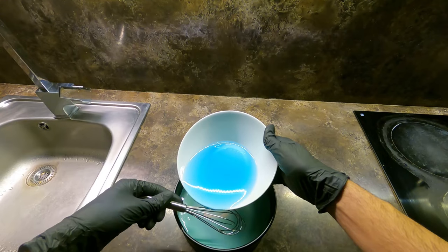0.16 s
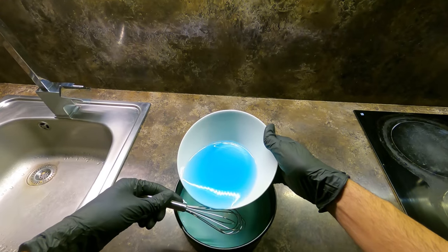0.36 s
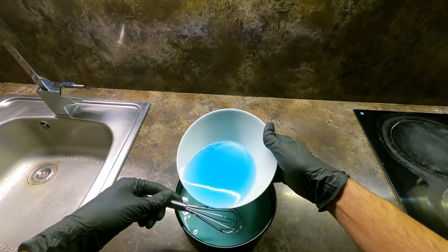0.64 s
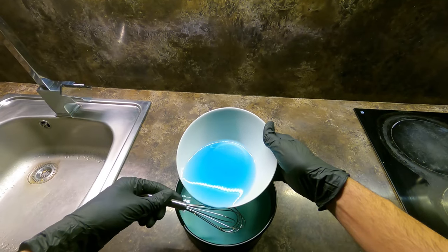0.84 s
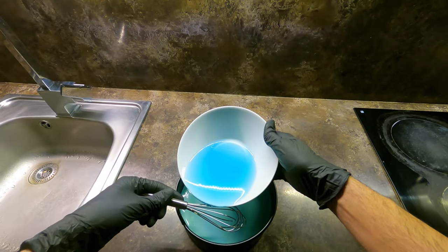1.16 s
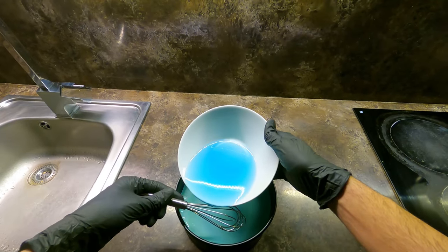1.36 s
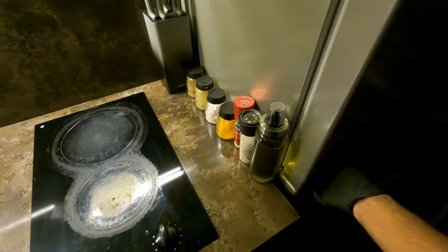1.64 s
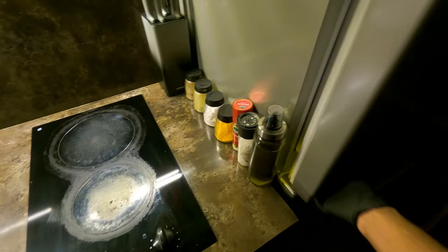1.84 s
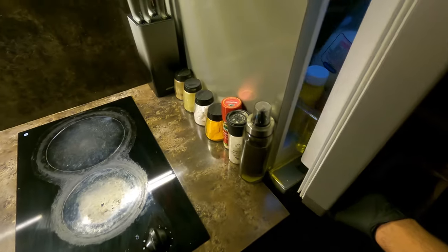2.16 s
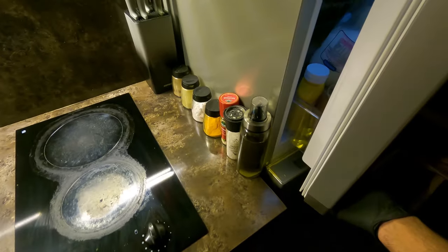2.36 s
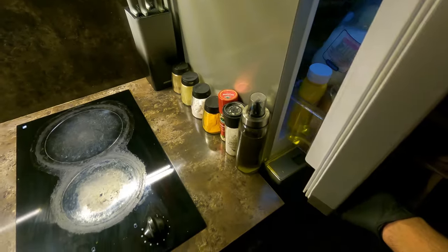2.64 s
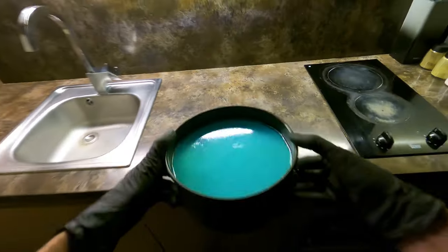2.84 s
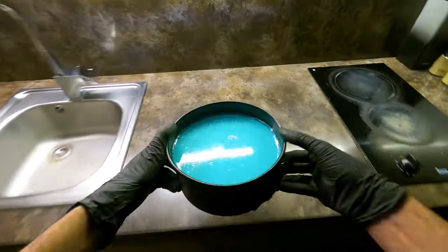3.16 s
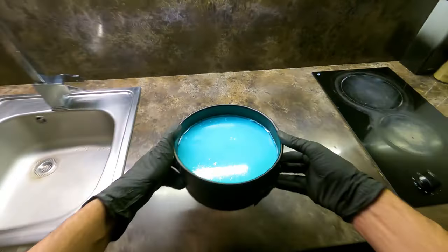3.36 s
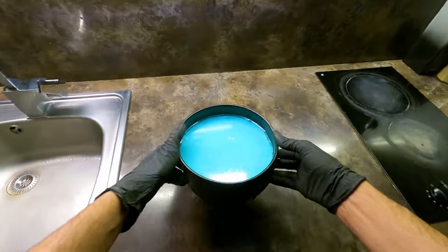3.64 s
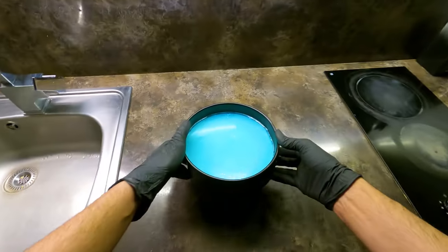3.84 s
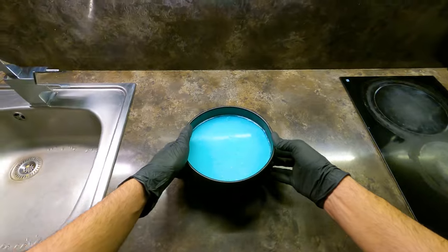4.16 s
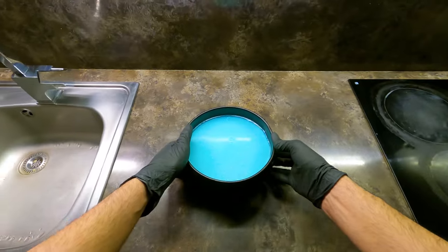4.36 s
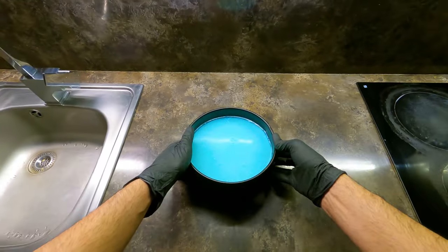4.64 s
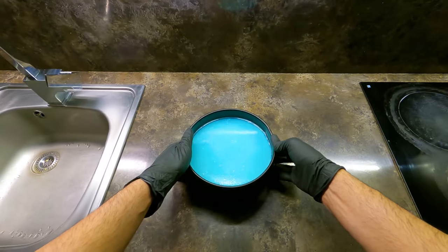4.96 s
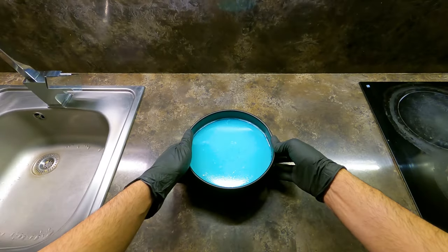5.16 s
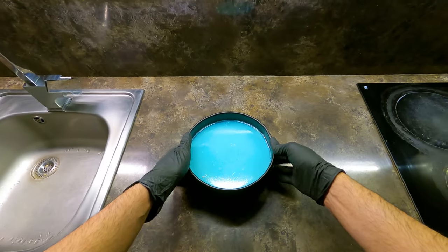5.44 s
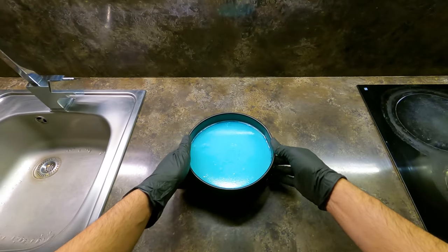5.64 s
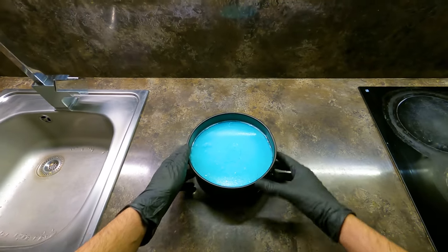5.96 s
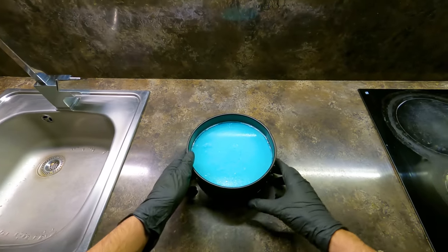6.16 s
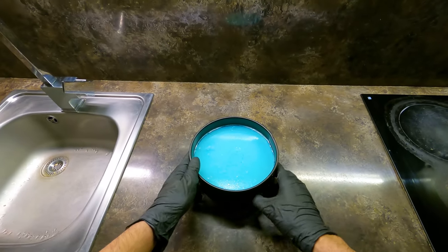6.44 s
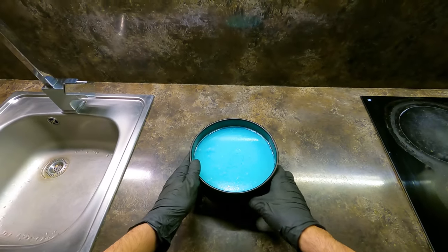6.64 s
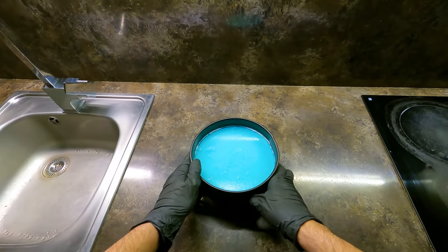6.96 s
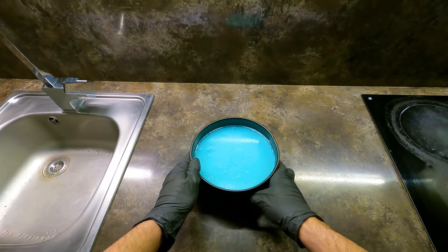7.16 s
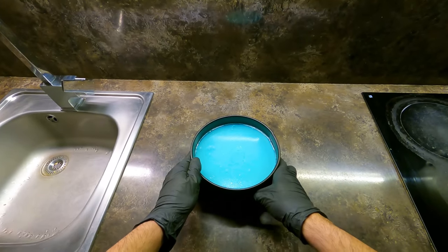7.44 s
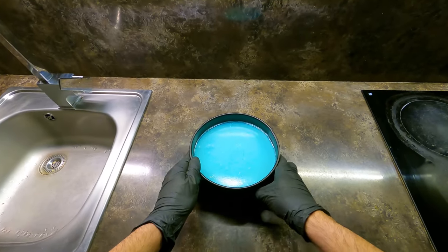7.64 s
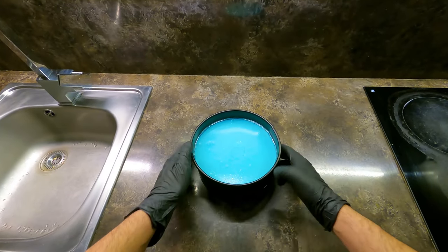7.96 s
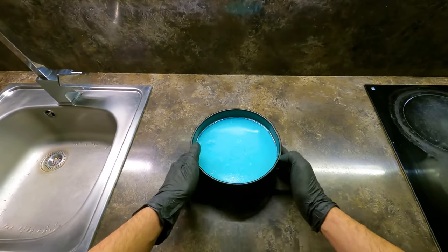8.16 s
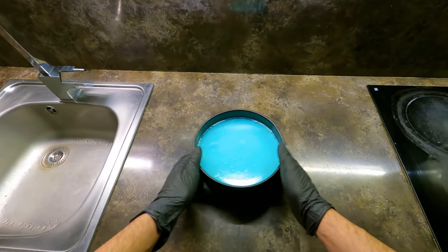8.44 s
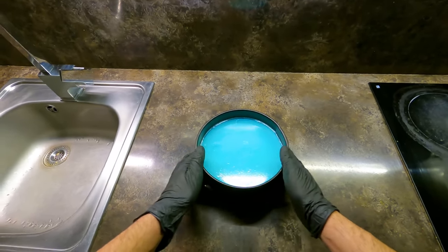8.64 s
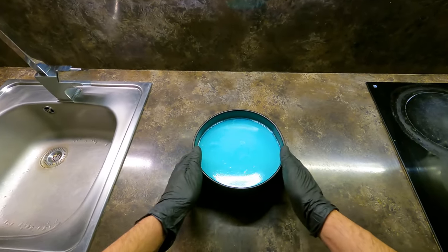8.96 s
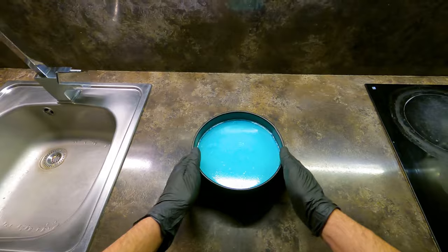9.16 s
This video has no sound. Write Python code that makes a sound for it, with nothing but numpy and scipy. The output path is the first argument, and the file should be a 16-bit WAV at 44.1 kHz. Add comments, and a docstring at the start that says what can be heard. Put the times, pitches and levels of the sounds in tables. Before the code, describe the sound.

In a small, hard kitchen, a fridge hums close to a body-worn microphone. Its door seal crackles free with a thump and shelf clicks. The hum cuts off and hollow knocks sound further away. A metal cake pan full of liquid then hits the countertop twice, ringing briefly with a deep worktop boom. Dry microphone bumps follow, then grainy glove rubbing, low shudders and light pan taps.

```python
"""A small kitchen, heard at a body-worn microphone. A fridge hums and its door is pulled open;
hollow knocks follow further off. Then a metal cake pan full of liquid is knocked twice on the
countertop and jiggled on it: the pan rings in decaying modes, the worktop booms, gloves rub as
grainy noise. The microphone's mount gives small dry bumps; rubber squeaks are narrow noise bursts."""
import sys
import numpy as np
from scipy import signal
from scipy.fft import rfft, irfft, next_fast_len
from scipy.io import wavfile
from scipy.ndimage import uniform_filter1d

SR = 44100
rng = np.random.default_rng(int(sys.argv[2]) if len(sys.argv) > 2 else 0)


def wav_record(signal):
    """Record a signal, one row per channel, as 16-bit PCM in the file named by sys.argv[1]."""
    frames = np.transpose(np.atleast_2d(signal))
    bounded = np.clip(frames, -1, 1)
    # unit amplitude maps onto the largest positive 16-bit level
    quanta = np.round(bounded * 32767).astype(np.int16)
    wavfile.write(sys.argv[1], SR, quanta)


N = 410571
TIME_S = np.arange(N) / SR
AGE_S = np.arange(2 ** 15) / SR  # time since a blow

# Table levels are relative; source functions may add trims.
# Room decay: hz, t60_s
ROOM_DECAY = [(100, 0.47), (400, 0.45), (1000, 0.47), (2000, 0.44), (5000, 0.49), (8000, 0.55),
              (13000, .18)]
# Left-right likeness: hz, likeness (0-1)
LIKENESS = [(60, 0.97), (250, 0.93), (1000, 0.72), (4000, 0.61), (8000, 0.76), (13000, .5)]
BAND_EDGE_HZ = 14200

# Still air: hz, db_per_hz
AIR_COLOUR = [(15, -8), (30, 8), (55, 2.5), (90, -8.5), (165, -1), (215, -3.5), (270, -12), (400, -17.5),
              (550, -15.5), (780, -25.5), (1100, -21.5), (2000, -36.5), (3200, -43.5), (7000, -38),
              (14000, -63.5)]
AIR_DB = -55
# Rumble of the swaying microphone: hz, db_per_hz
RUMBLE_COLOUR = [(15, -17), (30, 16.5), (55, 5), (100, -18.5), (250, -55)]
# Sways: middle_s, length_s, level_db
SWAYS = [(1.1, 0.27, -53), (1.3, .18, -48), (1.9, 0.23, -41), (2.8, 0.21, -53), (3.13, .25, -55),
         (3.85, 0.83, -53)]

# Fridge murmur: hz, db_per_hz
FRIDGE_COLOUR = [(100, -38), (150, 6), (220, 1), (335, 3.5), (400, -8), (520, -8), (800, -22),
                 (1080, -12.5), (1500, -28.5), (2800, -31.5), (3700, -40), (4700, -33), (6800, -49),
                 (9000, -83)]
FRIDGE_DB, FRIDGE_END_S = -53, 2.875
# Fridge tones: pitch_hz, level_db
FRIDGE_TONES = [(215.3, -66), (328.4, -63), (463, -75), (4479, -92)]
# Compressor shell resonances: hz, half_width_hz, level_db
SHELL_MODES = [(1038, 40, -1), (2960, 140, -30)]
WHINE_START_S, WHINE_DB, WHINE_FALL_DB_PER_S = 1.5, -81.5, 7

# Door seal crackle: hz, db_per_hz
SEAL_COLOUR = [(710, -29), (1200, -6.5), (1770, -8.5), (2070, -7.5), (2630, -15.5), (3720, -13),
               (6020, -15), (11900, -41), (14600, -58)]
# Door panel shake: hz, db_per_hz
PANEL_COLOUR = [(18, -32), (30, -26), (54, 3.5), (91, -18), (146, -2), (214, -11.5), (319, -14), (674, -24),
                (1210, -20.5), (1600, -39), (2080, -69), (3520, -120)]
# Seal letting go: peak_s, crackle_db, panel_db
PEELS = [(1.894, -49, -31), (2.1, -57.5, -46)]
PULL_DB_PER_S, RELAX_DB_PER_S = 145, 132  # crackle builds under the pull, dies once the seal is free
PANEL_RISE_DB_PER_S, PANEL_FALL_DB_PER_S = 228, 190
# Door jerking free: start_s, panel_db, seal_db
JERKS = [(1.811, -43, -59), (1.823, -50, -56.5), (1.8762, -40, -45.5), (1.896, -36, -49.5)]
# Door and shelf clicks: start_s, level_db
CLICKS = [(1.512, -58), (1.7785, -53), (1.808, -62), (1.875, -44), (2.021, -47), (2.0905, -31),
          (2.099, -38.5), (2.1289, -41.5), (2.458, -53)]
# Click colour: hz, db_per_hz
CLICK_COLOUR = [(410, -40), (700, -19), (1030, 3), (1150, -9), (1430, 6), (1680, -23), (1960, -7),
                (2630, -4.5), (3140, -9), (4320, 0.5), (5030, -8), (5790, 2), (7460, -12), (12000, -17),
                (14600, -46)]
# Shelf modes: hz, level_db, t60_s
SHELF_MODES = [(1430, -5, 0.18), (2550, -18, 0.17), (4250, -10, 0.11), (4390, 7, 0.073), (4930, 0, 0.088),
               (5400, -2, 0.065), (5660, 9, 0.036), (6200, -6, 0.083), (7260, -8, 0.079)]
# Air pushed by the open door: hz, db_per_hz
SWING_COLOUR = [(25, -1), (60, -3.5), (200, -47), (1500, -37), (4700, -30.5), (8000, -46), (14000, -58)]
SWING_DB, SWING_RISE_DB_PER_S, SWING_FALL_DB_PER_S = -49.5, 92, 2000

# Hollow knocks further off: start_s, ring_db, wash_db, wash_stretch (factor on room t60)
HOLLOW_KNOCKS = [(3.017, -57.5, -70.5, 2.3), (3.074, -59, -57.5, 1.64), (3.223, -65, -62, 0.7),
                 (3.668, -59.5, -75, 1.9), (3.859, -33.5, -54, 1.7), (3.975, -49, -59, 1.5)]
# Hollow ring colour: hz, db_per_hz
CAVITY_COLOUR = [(80, -12), (200, -13), (350, -8), (470, -2.5), (560, 1), (700, -6), (830, -12),
                 (1050, -18.5), (1350, -29), (2500, -70)]
# Bright wash colour: hz, db_per_hz
WASH_COLOUR = [(300, -14), (1200, 2), (2200, -2), (4200, -6), (7000, -15.5), (12000, -33)]
# Wash swells: middle_s, length_s, level_db
WASHES = [(3.24, 0.6, -65.5), (3.6, 0.62, -73), (4.05, 0.39, -62.5)]

# Mount bumps: start_s, bump_db, tick_db, left_minus_right_db
BUMPS = [(0.1524, -23, -48.5, -11.5), (1.8961, -19.5, -54, -11), (6.1022, -28, -55.5, -11),
         (6.357, -26, -54.5, -10.5), (6.5451, -22, -48.5, -11), (6.5905, -28.5, -63, -11.5),
         (6.883, -32, -59.5, -9.5)]
# Rubber squeaks and snaps: start_s, pitch_hz, level_db, length_s
SQUEAKS = [(0.198, 7050, -72, 0.049), (0.397, 6740, -69, 0.031), (1.116, 6600, -64.5, 0.029),
           (5.867, 2360, -69, 0.053), (6.099, 9000, -67, .004), (6.765, 6800, -66, .007),
           (6.881, 6500, -54, .004), (7.908, 2100, -64, 0.054), (7.985, 2440, -65.5, 0.054),
           (8.01, 2560, -50.5, 0.008)]

DRONE_START_S, DRONE_END_S, DRONE_FADE_S = 5.5, 6.75, 0.075
DRONE_DB, DRONE_FALL_DB_PER_S = -45.5, 4

# Strokes of gloves and sliding pan: middle_s, length_s, level_db
STROKES = [(2.92, .2, -84), (3.64, 0.61, -77), (4.34, 0.23, -84.5), (4.62, 0.52, -79.5), (4.83, .09, -60.5),
           (5.056, 0.044, -55), (5.1, .05, -55.5), (5.72, 0.35, -79.5), (6.02, 0.67, -73), (6.4, 0.35, -78),
           (6.76, 0.39, -76), (7.26, .2, -72.5), (7.42, 0.31, -75.5), (7.68, 0.22, -68), (7.99, 0.35, -61),
           (8.165, 0.19, -56), (8.3, 0.36, -70.5), (8.46, 0.24, -58), (8.6, 0.18, -55), (8.73, 0.19, -54),
           (8.845, 0.12, -59), (8.94, 0.11, -60.5), (9.025, 0.13, -65), (9.3, .08, -68.5)]
# Rub colour: hz, db_per_hz
RUB_COLOUR = [(400, -22.5), (800, -7.5), (1100, 1), (1700, -8), (3100, -11.5), (4000, -7.5), (4600, -2.5),
              (5100, -5), (5800, -6), (7400, -9.5), (8400, -17.5), (12000, -21), (14500, -41)]
# Shoves of the jiggled pan: peak_s, level_db
SHOVES = [(7.275, -36.5), (7.365, -35), (7.485, -30), (7.625, -29), (7.76, -36), (7.85, -39.5),
          (7.95, -35.5), (8.25, -38.5), (8.32, -38.5), (8.46, -45), (8.595, -33), (8.7, -37.5), (8.8, -36),
          (8.92, -37.5), (8.99, -36), (9.09, -44.5), (9.2, -45.5)]
SHOVE_RISE_DB_PER_S, SHOVE_FALL_DB_PER_S = 303, 190
# Worktop shudder colour: hz, db_per_hz
SHUDDER_COLOUR = [(35, -44), (55, 11), (70, 14), (84, 9.5), (98, 14), (115, 3.5), (140, -0.5), (220, -10),
                  (400, -67.5)]

# Pan on worktop: start_s, flatness (0 edge tap, 1 whole base), force_db, wall_share_db, sag_db, boom_db
KNOCKS = [(4.8468, 0.98, -24.5, -0.5, -20, -13), (4.852, 1, -33, 0, -54, -16.5),
          (5.111, 1, -22, -7, -15, -26.5), (5.1305, 1, -29.5, -8.5, -35.5, -24),
          (7.343, .2, -62, -2, -40.5, -40), (7.429, 0.59, -56.5, -4.5, -45, -35.5),
          (7.573, 0, -51, -2, -35.5, -34.5), (7.602, 0.7, -58, 2.5, -35, -43),
          (7.627, 0.47, -52, -6, -46, -56), (7.696, 0.054, -45, -0.5, -37.5, -41),
          (7.706, 1, -44, -3, -40, -50), (7.716, 0.64, -45, 2.5, -38, -28.5),
          (8.562, 0, -55.5, -14, -65, -31.5), (8.885, 0.93, -60, -0.5, -51, -46.5),
          (9.069, 1, -57, -6.5, -63.5, -59)]
# Worktop sag modes: hz, level_db, t60_s
SAG_MODES = [(56, 4.5, 0.41), (68, -3.5, 0.28), (77.5, -3, 0.49)]
# Worktop boom modes: hz, level_db, t60_s
BOOM_MODES = [(96.76, -2, 0.51), (109.74, 1.5, 0.44)]
# Pan bottom modes: hz, level_db, t60_s
BOTTOM_MODES = [(212.6, 1, 0.38), (231.5, 7.5, 0.25), (251, -11, 0.25), (286.6, -2, 0.304),
                (321.2, -2, 0.5), (379.6, -1.5, 0.77), (438.3, -4, 0.31), (522, -7.5, 0.306),
                (590, -12, .33), (636.5, -10.5, 0.37)]
# Pan wall modes: hz, level_db, t60_s
WALL_MODES = [(809, -6.5, 0.4), (880, -6, 0.42), (894, 1.5, 0.17), (966, 3.5, 0.23), (1020, 0.5, 0.27),
              (1148, 6.5, 0.13), (1220, -2, 0.056), (1258, -4, 0.12), (1267, -13, 0.54), (1400, -6, .32),
              (1492, -13.5, 0.25), (1614, -6.5, .28), (1732, -0.5, 0.14), (1850, -9, 0.19),
              (1940, -0.5, 0.098), (2065, -9.5, 0.15), (2160, -15, 0.16), (2560, -14, 0.18),
              (2730, -23.5, 0.26), (2810, -26, .25)]
# Dull part of the blow: hz, db_per_hz
THUD_COLOUR = [(80, -23.5), (170, 2), (260, -2.5), (480, 2.5), (700, -9.5), (1100, -17.5), (2500, -64)]
# Metallic part: hz, db_per_hz
CLANK_COLOUR = [(300, -23), (700, -13.5), (1000, 0), (1400, -8), (1900, -15.5), (2500, -22.5), (3400, -31),
                (7000, -51)]
# Bright contact part: hz, db_per_hz
TICK_COLOUR = [(1000, -18.5), (2500, -0.5), (4500, -2), (6500, -4.5), (8000, -13.5), (11000, -20),
               (14500, -29)]
TICK_DB_PER_FORCE_DB, TICK_EDGE_DB = 1.543, -6.5  # harder, flatter knocks are brighter


def amp(db):
    """Decibels to gain."""
    return np.exp(np.asarray(db) * np.log(10) / 20)


def evened(x):
    """Scale to rms 1."""
    return x / np.sqrt(np.mean(x ** 2) + 1e-20)


def struck(x, size=1323):
    """Scale a blow to rms 1 over its first 30 ms."""
    return x / np.sqrt(np.mean(x[..., :size] ** 2) + 1e-20)


def read(points, hz):
    """Interpolate a table on a log-frequency axis."""
    f, value = np.transpose(points)
    return np.interp(np.log(hz + 1), np.log(f + 1), value)


def add(mix, start_s, sound):
    """Mix a sound in at start_s."""
    part = mix[:, max(round(start_s * SR), 0):][:, :sound.shape[-1]]
    part += sound[..., :part.shape[-1]]


def onset(rise_s):
    """Smooth rise of a contact force."""
    return 1 - np.exp(-(AGE_S / rise_s) ** 2)


def decay(t60_s):
    """Exponential decay, 60 dB in t60_s."""
    return np.exp(-np.log(1000) * AGE_S / t60_s)


def span(start_s, end_s, fade_s):
    """Gain that fades in at start_s, holds, and fades out by end_s."""
    return np.clip(np.minimum(TIME_S - start_s, end_s - TIME_S) / fade_s, 0, 1)


def swells(rows):
    """Gain of movements that speed up and slow down smoothly; overlaps add in power."""
    power = np.zeros((1, N))
    for middle_s, length_s, db in rows:
        gain = amp(db) * np.hanning(int(length_s * SR))
        add(power, middle_s - length_s / 2, gain ** 2)
    return np.sqrt(power)


def surge(peak_s, db, rise_db_per_s, fall_db_per_s):
    """Gain that builds to a peak and dies away, linearly in dB."""
    drop_db = np.maximum(rise_db_per_s * (peak_s - TIME_S), fall_db_per_s * (TIME_S - peak_s))
    return amp(db - np.minimum(drop_db, 150))


def steadied(x, window_s):
    """Even out a noise's level over window_s."""
    power = uniform_filter1d((x ** 2).mean(0), max(int(window_s * SR), 1))
    return x / np.sqrt(abs(power) + 1e-12)


def lingering(gain, room_db, t60_s):
    """Room energy that outlasts each stroke, as a leaky average of power."""
    keep = np.exp(-2 * np.log(1000) / (t60_s * SR))
    room_power = signal.lfilter([1 - keep], [1, -keep], gain ** 2 + 1e-20)
    return np.sqrt(gain ** 2 + amp(room_db) ** 2 * room_power)


def lowpass(x, hz, order):
    """Steep treble cut."""
    return signal.sosfilt(signal.butter(order, hz, fs=SR, output="sos"), x)


def noise(colour, size, grain_db=0, side_db=0):
    """Coloured noise at two close ports; grain_db makes it crackle, side_db sets its width."""
    length = next_fast_len(size)
    hz = np.fft.rfftfreq(length, 1 / SR)
    grains = amp(grain_db * np.minimum(rng.exponential(1, length), 2 * np.pi))
    mid, side = rfft(rng.standard_normal((2, length)) * grains)
    same = np.clip(read(LIKENESS, hz), 0, 1)
    mid = mid * np.sqrt(1 + same)
    side = amp(side_db) * side * np.sqrt(1 - same)
    spectrum = np.array([mid + side, mid - side]) * amp(read(colour, hz))
    return evened(irfft(spectrum, length)[:, :size])


def tail(colour, stretch=1):
    """Dense ringing of the kitchen: each band dies at its own speed."""
    hz, t, z = signal.stft(noise(colour, len(AGE_S)), SR, nperseg=256)
    z = z * amp(-60 * t / (stretch * read(ROOM_DECAY, hz)[:, None]))
    return struck(signal.istft(z, SR, nperseg=256)[1][:, :len(AGE_S)])


def crack(colour, t60_s, room_db):
    """Short noise burst at the contact, plus the room's answer."""
    burst = struck(noise(colour, len(AGE_S), side_db=-5) * decay(t60_s))
    return struck(burst + amp(room_db) * tail(colour))


def ring(modes, scatter_db=0):
    """Dying modes; strengths change at random from blow to blow."""
    luck = rng.standard_normal(len(modes))
    total = np.zeros(len(AGE_S))
    for k, (hz, db, t60_s) in enumerate(modes):
        strength = (-1) ** k * amp(db + scatter_db * luck[k])
        total += strength * decay(t60_s) * np.sin(2 * np.pi * hz * AGE_S)
    return struck(total)


def still_air():
    """Steady coloured noise of the room's air."""
    return amp(AIR_DB) * noise(AIR_COLOUR, N)


def sways():
    """Low rumble swelling as the microphone sways."""
    return swells(SWAYS) * noise(RUMBLE_COLOUR, N)


def drift():
    """Slow random wander, rms 1."""
    return evened(signal.resample(rng.standard_normal(40), N))


def fridge(noise_db=-1.5, turn_hz=48.7, buzz_db=-69, waver_rad=0.24, whine_hz=4620):
    """Compressor: a murmur, thin tones, and a stroke each turn that rings its shell."""
    tones = np.zeros(N)
    for hz, db in FRIDGE_TONES:
        tones += amp(db) * evened(np.sin(2 * np.pi * hz * TIME_S + waver_rad * drift()))
    whine_db = WHINE_DB - WHINE_FALL_DB_PER_S * (TIME_S - WHINE_START_S)
    whine_gain = span(WHINE_START_S, FRIDGE_END_S, fade_s=0.02) * amp(whine_db)
    tones += whine_gain * evened(np.sin(2 * np.pi * whine_hz * TIME_S + 0.4 * drift()))

    turns = np.floor(turn_hz * TIME_S + 0.0091 * drift())
    strokes = np.diff(turns, prepend=0) * (1 + 0.11 * rng.standard_normal(N))
    for hz, half_width_hz, db in SHELL_MODES:
        shell = signal.iirpeak(hz, hz / (2 * half_width_hz), SR)
        buzz = signal.lfilter(*shell, signal.lfilter(*shell, strokes))
        tones += amp(db + buzz_db) * evened(buzz)
    murmur = amp(FRIDGE_DB + noise_db) * noise(FRIDGE_COLOUR, N)
    return (murmur + tones) * np.clip((FRIDGE_END_S - TIME_S) / 0.03, 0, 1)


def door(peel_db=-1, panel_trim_db=-4, click_db=-14, shelf_db=-6.5):
    """The seal peels away, the panel shakes, the shelves click, and the door swings wide."""
    crackling, shaking = np.zeros(N), np.zeros(N)
    for s, crackle_db, panel_db in PEELS:
        crackling += surge(s, crackle_db + peel_db, PULL_DB_PER_S, RELAX_DB_PER_S)
        shaking += surge(s, panel_db + panel_trim_db, PANEL_RISE_DB_PER_S, PANEL_FALL_DB_PER_S)
    out = crackling * noise(SEAL_COLOUR, N, grain_db=3.5) + shaking * noise(PANEL_COLOUR, N)
    swing = surge(FRIDGE_END_S, SWING_DB, SWING_RISE_DB_PER_S, SWING_FALL_DB_PER_S)
    out += swing * noise(SWING_COLOUR, N)
    for s, panel_db, seal_db in JERKS:
        panel = amp(panel_db) * crack(PANEL_COLOUR, t60_s=0.055, room_db=-1.0)
        seal = amp(seal_db) * crack(SEAL_COLOUR, t60_s=0.02, room_db=-8.5)
        add(out, s, onset(0.0008) * (panel + seal))
    for s, db in CLICKS:
        click = crack(CLICK_COLOUR, t60_s=0.041, room_db=-14.5) + amp(shelf_db) * ring(SHELF_MODES)
        add(out, s, amp(db + click_db) * onset(0.00052) * click)
    return out


def hollow_knocks():
    """Knocks heard mostly through the room, with a bright wash that swells behind them."""
    out = np.zeros((2, N))
    for s, ring_db, wash_db, wash_stretch in HOLLOW_KNOCKS:
        contact = amp(-18) * crack(CLANK_COLOUR, t60_s=0.029, room_db=-5)
        knock = onset(0.00083) * (tail(CAVITY_COLOUR, stretch=1.13) + contact)
        wash = onset(0.01) * tail(WASH_COLOUR, stretch=wash_stretch)
        add(out, s, amp(ring_db) * knock + amp(wash_db) * wash)
    return out + swells(WASHES) * noise(WASH_COLOUR, N, grain_db=2.5)


def pulse(width_s):
    """Two-sided pressure pulse: up, then under."""
    x = AGE_S / width_s
    return (1 - x) * x * np.exp(1 - x)


def mount_bumps(thump_hz=105, thump_s=0.0027, sway_hz=34, sway_s=0.0059, sway=0.85,
                snap_s=0.00039, snap=0.65, tick_s=0.00004, tick_trim_db=21, bump_trim_db=5):
    """Bumps through the microphone's case: a tick, a snap and a dead thump, with no room."""
    out = np.zeros((2, N))
    thump_shape = (AGE_S / thump_s) * np.exp(1 - 2 * AGE_S / thump_s)
    thump = np.sin(2 * np.pi * thump_hz * AGE_S) * thump_shape
    rock = sway * np.sin(2 * np.pi * sway_hz * AGE_S) * np.exp(-AGE_S / sway_s)
    body = rock - 2 * thump - snap * pulse(snap_s)
    for s, bump_db, tick_db, balance_db in BUMPS:
        bump = amp(bump_db + bump_trim_db) * body - amp(tick_db + tick_trim_db) * pulse(tick_s)
        add(out, s, bump * amp([[balance_db / 2], [-balance_db / 2]]))
    return lowpass(out, hz=6800, order=6)


def squeaks(width=0.13):
    """Brief, raspy rubber squeaks: noise narrowed around one pitch."""
    out = np.zeros((2, N))
    for s, hz, db, length_s in SQUEAKS:
        size = int(length_s * SR)
        colour = [(hz * (1 - width) ** 3, -40), (hz, 0), (hz * (1 + width) ** 3, -40)]
        add(out, s, amp(db) * noise(colour, size) * np.hanning(size))
    return out


def drone(pitch_hz=56):
    """Low sine that fades in, weakens slowly and fades out."""
    fall_db = DRONE_FALL_DB_PER_S * (TIME_S - DRONE_START_S)
    gain = span(DRONE_START_S, DRONE_END_S, DRONE_FADE_S) * amp(DRONE_DB - fall_db)
    return gain * evened(np.sin(2 * np.pi * pitch_hz * TIME_S))


def rubbing(rub_db=-1, grip_db=1.5):
    """Gloves and pan rub in fine grains; the rubber grips and slips at random."""
    strokes = lingering(swells(STROKES), room_db=-4.5, t60_s=0.35)
    rub = amp(rub_db) * strokes * noise(RUB_COLOUR, N, grain_db=2.5)
    return rub * amp(grip_db * signal.resample(rng.standard_normal(N // 600), N))


def worktop_shudder(shudder_db=-3):
    """Each shove of the jiggled pan makes the worktop shudder: low noise under a surge."""
    surges = [surge(s, db, SHOVE_RISE_DB_PER_S, SHOVE_FALL_DB_PER_S) for s, db in SHOVES]
    push = np.max(surges, axis=0)
    return amp(shudder_db) * push * steadied(noise(SHUDDER_COLOUR, N), window_s=0.031)


def pan_knocks(sag_trim_db=-1, boom_trim_db=-1, bottom_db=-3, wall_db=-4, thud_db=-3.0,
               clank_db=-0.5, tick_trim_db=-6, worktop_rise_s=0.0062, rim_hz=1130, edge_db=22,
               contact_s=0.00057, edge_contact_s=0.001):
    """Each knock ticks, rings the pan's bottom and wall, and sets the worktop swinging."""
    out = np.zeros((2, N))
    for s, flatness, force_db, wall_share_db, sag_db, boom_db in KNOCKS:
        edge = np.clip(1 - flatness, 0, 1)
        sag = amp(sag_db + sag_trim_db) * ring(SAG_MODES)
        boom = amp(boom_db + boom_trim_db) * ring(BOOM_MODES)
        worktop = onset(worktop_rise_s) * (sag + boom)

        bottom = amp(bottom_db) * ring(BOTTOM_MODES, scatter_db=2)
        base = bottom + amp(thud_db) * crack(THUD_COLOUR, t60_s=0.063, room_db=-6.0)

        # an edge tap is softer and favours modes near the rim tone
        modes = [(hz, db - edge * edge_db * np.sqrt(abs(np.log2(hz / rim_hz))), t60_s)
                 for hz, db, t60_s in WALL_MODES]
        clank = (1 - edge / 2) * amp(clank_db) * crack(CLANK_COLOUR, t60_s=0.051, room_db=-5.5)
        wall = amp(wall_db) * ring(modes, scatter_db=2) + clank
        metal_onset = onset(contact_s + edge * edge_contact_s)
        metal = metal_onset * amp(force_db) * (base + amp(wall_share_db) * wall)

        tick_db = TICK_DB_PER_FORCE_DB * force_db + TICK_EDGE_DB * edge + tick_trim_db
        tick = amp(tick_db) * onset(contact_s) * crack(TICK_COLOUR, t60_s=0.047, room_db=-16.5)
        add(out, s, worktop + metal + tick)
    return out


def scene():
    """All sources over the still air of the kitchen."""
    background = still_air() + sways() + fridge() + door() + hollow_knocks()
    handling = mount_bumps() + squeaks() + drone() + rubbing() + worktop_shudder()
    return background + handling + pan_knocks()


def record(dry):
    """Band limit of the microphone: linear-phase lowpass."""
    lowpass_taps = signal.firwin(255, BAND_EDGE_HZ, window=("kaiser", 9), fs=SR)
    return signal.oaconvolve(dry, lowpass_taps[None], "same")


dry = scene()
out = record(dry)
wav_record(out)
```